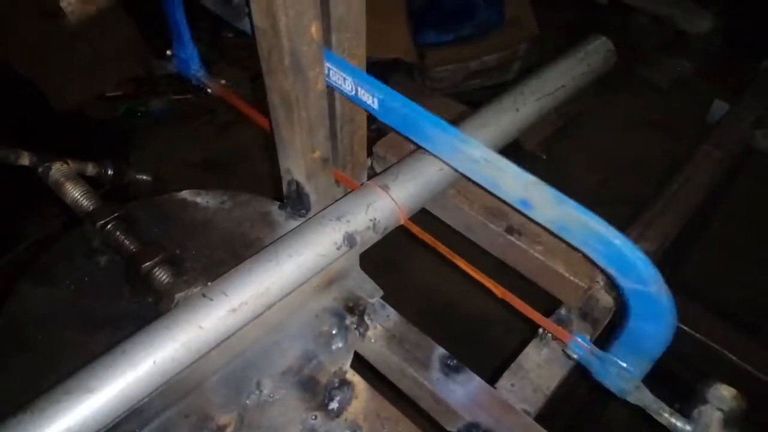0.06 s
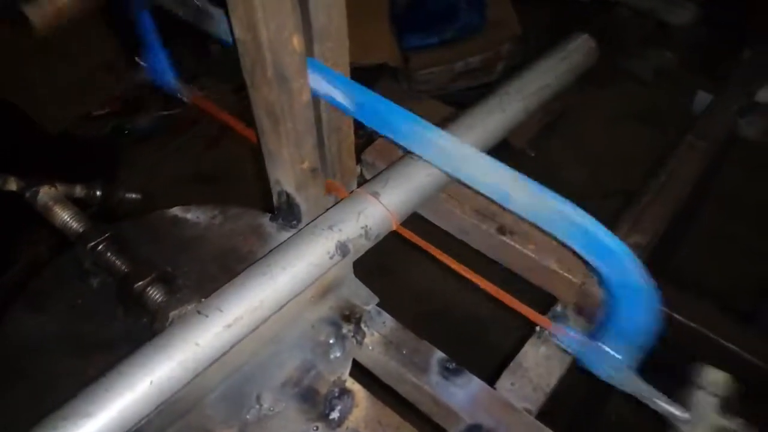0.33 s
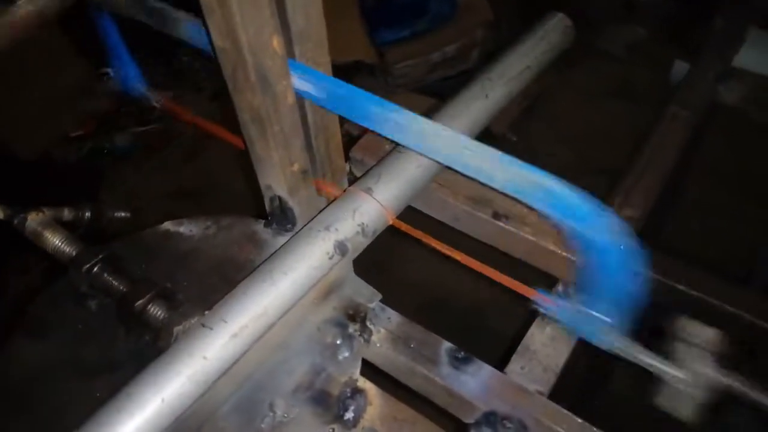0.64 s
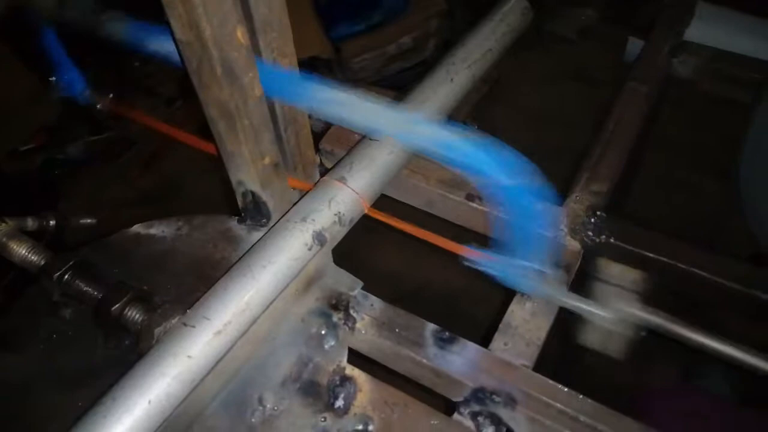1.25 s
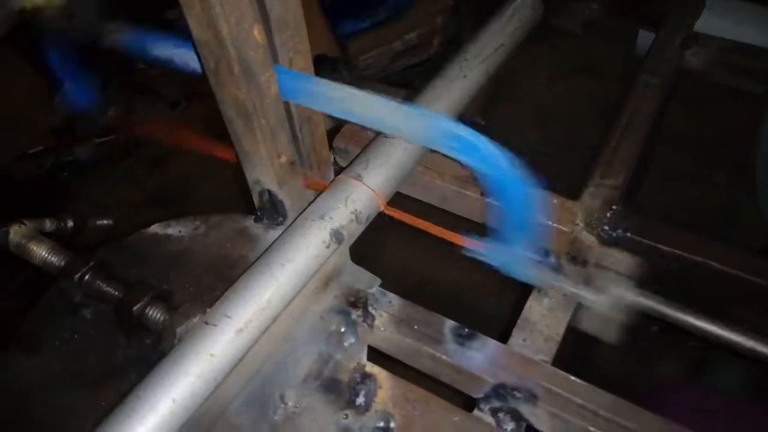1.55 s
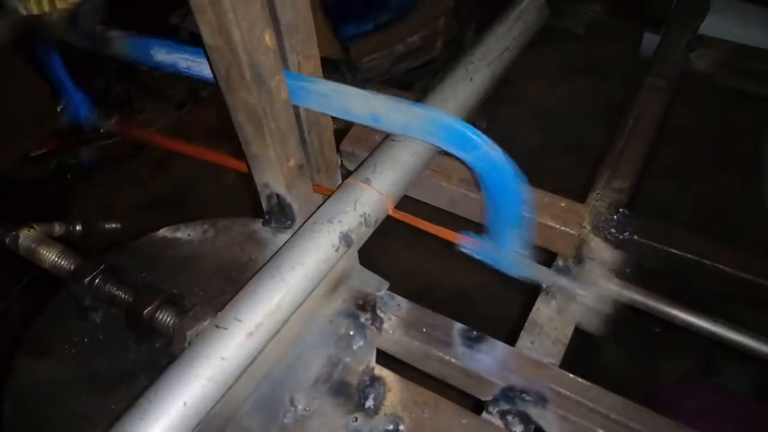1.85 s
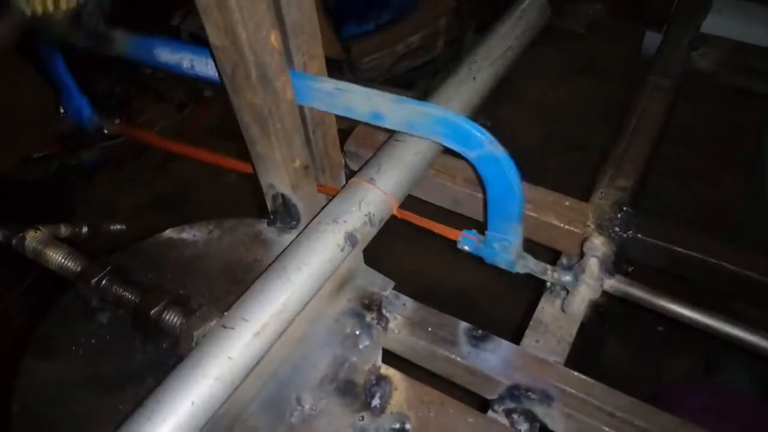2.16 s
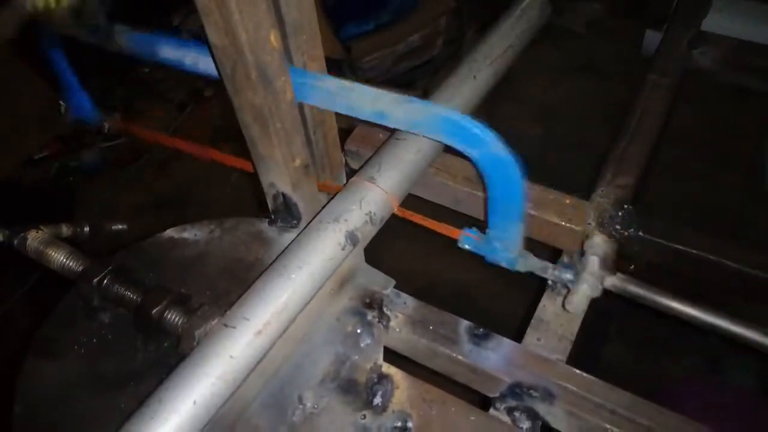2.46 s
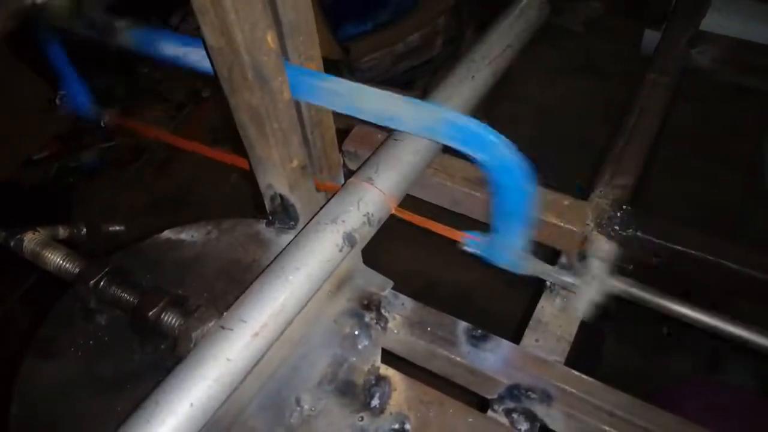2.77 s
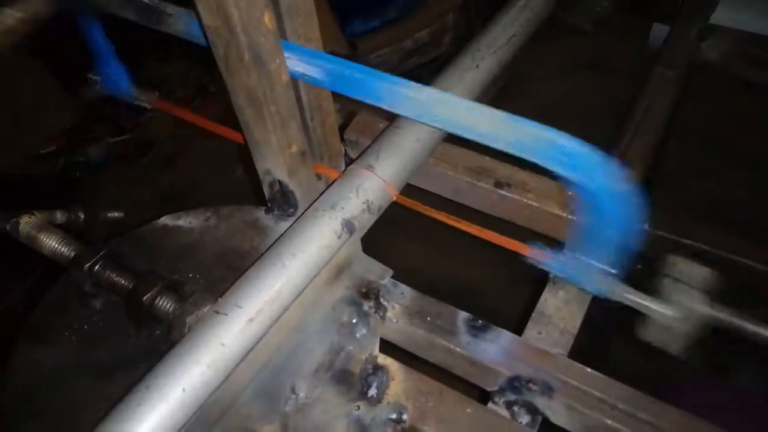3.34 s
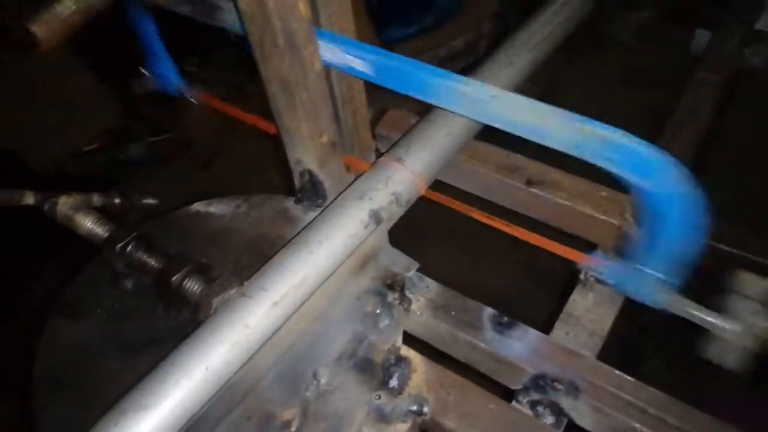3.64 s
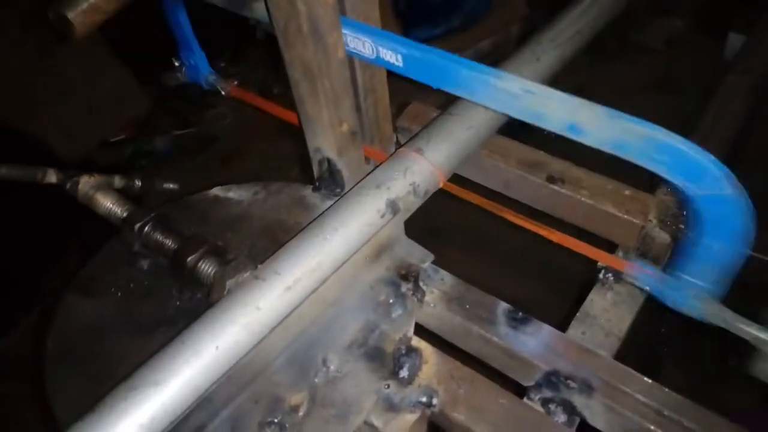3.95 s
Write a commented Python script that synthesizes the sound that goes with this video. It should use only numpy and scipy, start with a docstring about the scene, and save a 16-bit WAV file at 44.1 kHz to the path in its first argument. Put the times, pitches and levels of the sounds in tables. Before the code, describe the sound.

A power hacksaw cuts a steel pipe at about three strokes a second, its loose joints slamming and rattling over a whirring motor. The teeth rasp and the blade sings, so close in a small workshop that the knocks distort.

```python
"""A small workshop, one microphone so close to a power hacksaw that it overloads.
A motor drives the saw over a steel pipe through a crank and a loose rod, about three strokes a second.
The rod's joint slams at one end of the stroke and knocks twice at the other, ringing the steel;
loose parts rattle between. The drive whirs, the teeth rasp and the blade sings."""
import sys
import numpy as np
from scipy import signal
from scipy.fft import rfft, irfft, next_fast_len
from scipy.io import wavfile
from scipy.ndimage import map_coordinates

SR = 44100
rng = np.random.default_rng(int(sys.argv[2]) if len(sys.argv) > 2 else 0)


def output_pcm(signal):
    """Save a mono or channel-first signal as 16-bit PCM at the path in sys.argv[1].

    Samples are clipped to [-1, 1] before scaling.
    """
    pcm = np.clip(np.atleast_2d(signal).T, -1, 1) * 32767
    wavfile.write(sys.argv[1], SR, np.round(pcm).astype(np.int16))


N = 4 * SR
TIME_S = np.arange(N) / SR
ATTACK_S = 0.0012


def amp(db):
    """Decibels to gain."""
    return 10 ** (np.asarray(db) / 20)


def unit(x):
    """Scaled to rms 1."""
    return x / np.sqrt(np.mean(x ** 2) + 1e-20)


def along(points, hz):
    """Read (Hz, value) points on a log frequency axis."""
    freqs, values = np.transpose(points)
    return np.interp(np.log(hz + 1), np.log(freqs + 1), values)


def wobble(rate, size=N):
    """A smooth random curve, rate knots a second."""
    knots = rng.standard_normal(4096)
    return map_coordinates(knots, [np.arange(size) * rate / SR], mode="wrap")


def filtered(x, response):
    """x shaped by a gain that depends on frequency."""
    size = next_fast_len(N + SR // 2)
    return irfft(rfft(x, size) * response(np.fft.rfftfreq(size, 1 / SR)), size)[:N]


def grit(spectrum, spread_db, rate):
    """Dense tiny contacts of uneven size, coloured, rms 1."""
    contacts = rng.standard_normal(N) * amp(spread_db * wobble(rate))
    return unit(filtered(contacts, lambda hz: amp(along(spectrum, hz))))


def burst(start_s, hold_s, fall_s):
    """Quick attack, hold, exponential release."""
    t = np.maximum(TIME_S - start_s, 0)
    return (1 - np.exp(-t / ATTACK_S)) * np.exp(-np.clip((t - hold_s) / fall_s, 0, 50))


def swell(peak_s, width_s):
    """A bell-shaped rise and fall."""
    return np.exp(-.5 * np.minimum(((TIME_S - peak_s) / width_s) ** 2, 100))


def decay(t, t60_s):
    """A fall of 60 dB every t60_s."""
    return np.exp(-np.log(1000) * t / t60_s)


def add(track, start_s, sound):
    """Mix a sound in at a time."""
    i = max(round(start_s * SR), 0)
    track[i:i + len(sound)] += sound[:max(N - i, 0)]


# The drive's whir, close up: freq_hz, level_db
WHIR_SPECTRUM = [(20, -27), (35, -25), (70, -21.5), (190, -10), (260, -15.5), (360, -6.5), (580, -9),
                 (740, -3.5), (1000, -1), (1600, 3.5), (2050, 1.5), (2600, -1.5), (3500, 4.5), (5200, 5),
                 (6000, -6.5), (6900, -24.5), (9700, -24.5), (10900, -27.5), (12000, -48), (15500, -46)]
# Resonances kept alive by the running drive: pitch_hz, width_hz, level_db
HUM_MODES = [(729, 17, -8), (1320, 12, -2), (1820, 10, -6), (2604, 120, 5.5), (3268, 39, 8.5),
             (3950, 78, -18), (4920, 19, -1.5), (5910, 75, -3.5), (7280, 33, -20.5), (8560, 53, -41)]
# Drifting gear whine: time_s, pitch_hz
GEAR_WHINE = [(0, 790), (.6, 793), (1.2, 791), (1.9, 794), (2.6, 797), (3, 788), (3.4, 792), (4, 785)]

def drive():
    """Motor and gears: a gritty whir, the resonances that it stirs, and a faint whine."""
    def body(hz):
        modes = sum(amp(db) * np.sqrt(width) * 1j * hz / (pitch ** 2 - hz ** 2 + 1j * hz * width)
                    for pitch, width, db in HUM_MODES)
        return modes / (1 + (hz / 9500) ** 10)  # steep low-pass

    whir = amp(-16.5 + wobble(40)) * grit(WHIR_SPECTRUM, spread_db=2, rate=800)
    hum = amp(-21) * unit(filtered(rng.standard_normal(N), body))
    whine_hz = np.interp(TIME_S, *np.transpose(GEAR_WHINE)) + 3 * wobble(25.4)
    cycles = np.cumsum(whine_hz) / SR
    whine = amp(-39 + 2 * wobble(7.77)) * np.sqrt(2) * np.sin(2 * np.pi * cycles)
    return whir + hum + whine


# Low rumble from the stand under the saw: freq_hz, level_db
RUMBLE_SPECTRUM = [(25, -28), (45, 0), (75, 2), (170, 2.5), (300, -2), (900, -48)]
# Its dull thuds: peak_s, level_db
STAND_THUDS = [(.36, -35), (.99, -37), (1.03, -36), (1.51, -42), (1.87, -40), (2.12, -49), (2.36, -38),
               (2.79, -38), (2.89, -41), (3.2, -42), (3.63, -34), (3.78, -30)]

def stand():
    """The shaking stand rumbles faintly and thuds now and then."""
    shaking = amp(-54 + 3.5 * wobble(12))
    thuds = sum(amp(db) * swell(peak, width_s=0.016) for peak, db in STAND_THUDS)
    rumble = filtered(rng.standard_normal(N), lambda hz: amp(along(RUMBLE_SPECTRUM, hz)))
    return (shaking + thuds) * unit(rumble)


# Shakes of a small loose steel part: start_s, level_db
SHAKES = [(.0, 4), (.055, -10), (.165, 7), (.29, -5), (1.58, -12), (1.9, 12.5), (1.98, 5), (2.22, -4),
          (2.29, -5)]
# Its modes: pitch_hz, level_db, t60_s
SMALL_PART_MODES = [(5944, -28, .26), (6923, -33, .2), (7400, -39, .2), (9260, -37, .19)]

def jingle():
    """The small part's high modes are struck anew at each shake."""
    out, t = np.zeros(N), np.arange(SR // 4) / SR
    for start, db in SHAKES:
        for hz, mode_db, t60 in SMALL_PART_MODES:
            angle = 2 * np.pi * hz * t + 0.62 * wobble(225, size=len(t))
            gain = amp(db + mode_db + 2 * rng.standard_normal())
            add(out, start, gain * decay(t, t60) * np.sin(angle))
    return out


# Modes of the saw frame and rod: pitch_hz, slam_db, return_db, t60_s
FRAME_MODES = [(1302, -5.5, -4, .14), (2303, -4.5, -7.5, .11), (2594, -.5, 0, .11), (3464, 0, -10, .13),
               (3915, -4, -3, .08), (4975, -2, -3, .15), (1735, -14, -20, .12), (2760, -8, -11, .09),
               (3725, -10, -7, .08), (4690, -5, -12, .1), (4828, -6, -12, .15), (5944, -16, -13, .22),
               (6327, -15, -25, .14), (6923, -29, -20, .18), (7400, -22, -30, .12), (7620, -23, -25, .1)]

def steel_ring(on_return=False):
    """The steel's modes build up and die away, a little different at each blow."""
    t = np.arange(SR // 4) / SR
    out = np.zeros(len(t))
    for hz, slam_db, return_db, t60 in FRAME_MODES:
        scatter, detune, phase = rng.standard_normal(3)
        waver = 0.55 * wobble(165, size=len(t))
        angle = 2 * np.pi * (hz * (1 + 0.004 * detune) * t + phase) + waver
        db = return_db if on_return else slam_db
        out += amp(db + 1.5 * scatter) * decay(t, t60) * np.sin(angle)
    return amp(-12) * out * (1 - np.exp(-t / 0.006))


# Light rattles between the heavy blows: start_s, level_db
JOINT_RATTLES = [(.003, 4), (0.052, 1), (.16, -6), (.2, 2), (0.691, 6), (.728, 0), (0.807, 1), (.826, -18),
                 (1.016, 3), (1.121, -1), (1.159, 1.5), (1.333, 4), (1.448, 1), (1.484, -20), (1.55, -1.5),
                 (1.62, -1), (1.659, 4), (1.802, 5.5), (1.849, -0.5), (1.943, 2), (1.981, 2), (2.09, -3),
                 (2.302, 1), (2.42, 4.5), (2.439, 2.5), (2.625, 0.5), (2.826, -14), (2.989, 3),
                 (3.073, 6.5), (3.27, 3.5), (3.386, 5.5), (3.442, -2), (3.478, 1), (3.54, -0.5), (3.789, 0)]

def rattles():
    """The loose joints clatter: contact force and the ring it leaves."""
    force, ring = np.zeros((2, N))
    for start, db in JOINT_RATTLES:
        force += amp(db - 15) * burst(start, hold_s=0.0096, fall_s=0.014)
        add(ring, start, amp(db - 8) * steel_ring())
    return force, ring


def chips(per_second=160, low_hz=3614, high_hz=9900, db_per_octave=-14):
    """Chips and grit ping under the teeth at random moments and pitches, the high ones weaker."""
    out, t = np.zeros(N), np.arange(SR // 20) / SR
    envelope = (1 - np.exp(-t / ATTACK_S)) * decay(t, t60_s=0.045)
    gaps, heights, sizes = rng.random((1000, 3)).T
    starts = np.cumsum(-np.log(gaps)) / per_second
    for start, height, size in zip(starts, heights, sizes):
        hz = low_hz * (high_hz / low_hz) ** height
        db = -19.5 + 5.5 * min(-np.log(size), 3) + db_per_octave * np.log2(hz / low_hz)
        add(out, start, amp(db) * envelope * np.sin(2 * np.pi * hz * t))
    return out


# Cutting strokes, each opening with a slam: start_s, slam_db, chatter_s, singing_db
STROKES = [(0.108, -1.5, 0.033, 3), (0.428, -2, 0.029, -18), (0.75, -2, 0.029, 1.5), (1.075, -2, 0.03, -20),
           (1.399, -2, 0.032, 1), (1.714, -4, 0.036, -19), (2.046, -1.5, 0.032, 9.5),
           (2.354, -3, 0.044, 8.5), (2.698, -1, 0.02, -24), (3.002, -3, 0.037, -16),
           (3.331, -1.5, 0.02, 5.5), (3.655, -2.5, 0.025, 10), (3.966, -1.5, 0.031, -6)]

def slams():
    """The slack joint slams and chatters against its stop: contact force and ring."""
    force, ring = np.zeros((2, N))
    for start, db, chatter_s, _ in STROKES:
        force += amp(db - 6) * burst(start, chatter_s, fall_s=0.0074)
        add(ring, start + 0.0069, amp(db + 9) * steel_ring())
    return force, ring


# Teeth on the pipe, close up: freq_hz, level_db
RASP_SPECTRUM = [(100, -15), (700, -7.5), (1500, -16.5), (2500, 1), (4000, 4.5), (5000, 9.5), (5800, 0),
                 (6800, -6.5), (9800, -16.5), (11500, -30), (15500, -37)]

def blade(singing_hz=3296):
    """The teeth rasp harder on the cut than on the way back; the blade sings as it bites."""
    cut = sum(swell(start + 0.066, width_s=0.015) for start, *_ in STROKES)
    back = sum(swell(start + 0.17, width_s=0.042) for start, *_ in STROKES)
    speed = cut + amp(-4.5) * back
    rasp = amp(-16 + 1.6 * wobble(70)) * speed * grit(RASP_SPECTRUM, spread_db=2.4, rate=900)
    bite = sum(amp(db) * swell(start + 0.057, width_s=0.029) for start, _, _, db in STROKES)
    song = np.sqrt(2) * np.sin(2 * np.pi * singing_hz * TIME_S + 1.5 * wobble(45))
    return rasp + amp(-21.5 + 0.74 * wobble(60)) * bite * song


# Double knocks at the near end of the stroke: start_s, level_db, rebound_delay_s, rebound_db
RETURN_KNOCKS = [(0.288, -3.5, 0.024, -1.5), (0.605, -2.5, 0.027, 0.5), (0.936, -2, 0.022, -1.5),
                 (1.253, -1, 0.024, -2.5), (1.577, -1.5, .026, 0.5), (1.897, -0.5, .026, 1),
                 (2.22, -1.5, 0.025, 2), (2.543, -1, .028, -6.5), (2.866, -3, 0.019, -1),
                 (3.189, -3.5, 0.029, -4), (3.487, -3.5, 0.024, 1.5), (3.834, -5, .025, -4.5)]

def return_knocks(hold_s=0.0058, fall_s=0.01):
    """The joint knocks as the rod reverses, then rebounds: contact force and ring."""
    force, ring = np.zeros((2, N))
    for start, db, delay, rebound_db in RETURN_KNOCKS:
        force += amp(db - 8) * burst(start, hold_s, fall_s)
        force += amp(rebound_db - 8) * burst(start + delay, hold_s, fall_s)
        add(ring, start, amp(db + 8.5) * steel_ring(on_return=True))
        add(ring, start + delay, amp(rebound_db + 0.5) * steel_ring(on_return=True))
    return force, ring


# Squeaks from the cut: peak_s, pitch_hz, level_db
BLADE_SQUEAKS = [(.70, 5340, -20), (1.5, 5160, -17), (2.79, 5300, -22), (2.9, 5480, -13.5),
                 (3.445, 3180, -19), (3.84, 3900, -11.5)]

def squeaks():
    """The blade sticks and slips for a few milliseconds on one unsteady pitch."""
    out, waver = np.zeros(N), 0.96 * wobble(250)
    for peak, hz, db in BLADE_SQUEAKS:
        tone = np.sqrt(2) * np.sin(2 * np.pi * hz * TIME_S + waver)
        out += amp(db) * swell(peak, width_s=0.0077) * tone
    return out


# Steel clashing on steel, close up: freq_hz, level_db
CLASH_SPECTRUM = [(60, -50), (400, -24.5), (1000, -15), (2000, -7.5), (2500, 0.5), (3500, 1.5), (4300, 1),
                  (5100, 1.5), (5900, -3.5), (6800, -15.5), (9800, -23), (11500, -28), (15500, -49)]

def joints():
    """All the joints' blows together: a gritty clash that follows the force, plus the ringing."""
    force, ring = np.sum([slams(), return_knocks(), rattles()], axis=0)
    return force * grit(CLASH_SPECTRUM, spread_db=2, rate=600) + ring


# The small room around the saw: freq_hz, t60_s
ROOM_DECAY = [(200, 0.36), (3000, 0.35), (12000, 0.36)]

def workshop(x):
    """The walls return a short diffuse tail, about equally long at all pitches."""
    hz, t, spectra = signal.stft(rng.standard_normal(SR // 2), SR, nperseg=256)
    _, tail = signal.istft(spectra * decay(t, along(ROOM_DECAY, hz)[:, None]), SR, nperseg=256)
    tail = np.pad(tail, (SR // 250, 0))  # arrives 4 ms late
    return signal.fftconvolve(x, tail / np.linalg.norm(tail))[:N]


def scene():
    """The machine up close and the room behind it, one microphone on both channels."""
    saw = joints() + blade() + squeaks() + jingle() + chips()
    mono = saw + amp(-9.5) * workshop(saw) + drive() + stand()
    return np.array([mono, mono])


# The recorder's treble lift: freq_hz, gain_db
TREBLE_LIFT = [(1000, 0.5), (6000, -1), (9000, 5), (12000, 3), (15500, 12)]

def record(dry):
    """The loudest knocks clip hard; then the treble is lifted and both ends of the band are cut."""
    clip_level, low_cut_hz, top_hz = 0.81, 64, 15768

    def response(hz):
        low_cut = hz ** 2 / np.hypot(hz ** 2, low_cut_hz ** 2)
        return low_cut * amp(along(TREBLE_LIFT, hz)) * (hz < top_hz)

    clipped = np.clip(dry, -clip_level, clip_level)
    return np.array([filtered(channel, response) for channel in clipped])


dry = scene()
out = record(dry)
output_pcm(out)
```